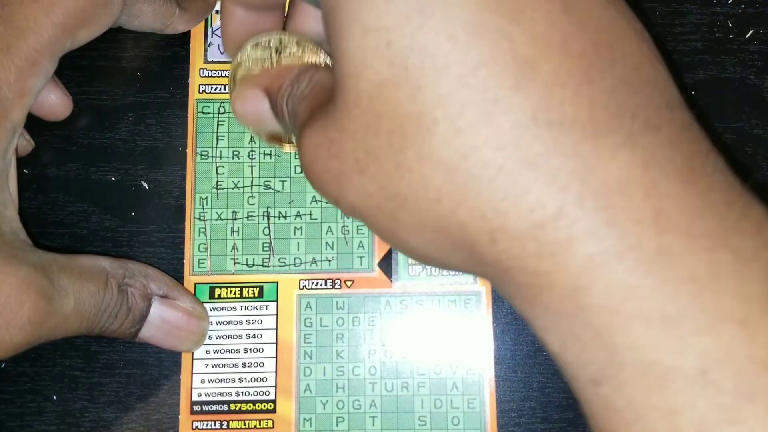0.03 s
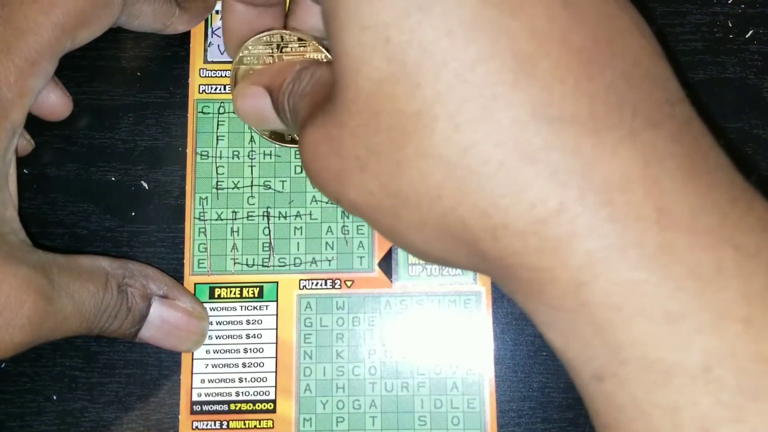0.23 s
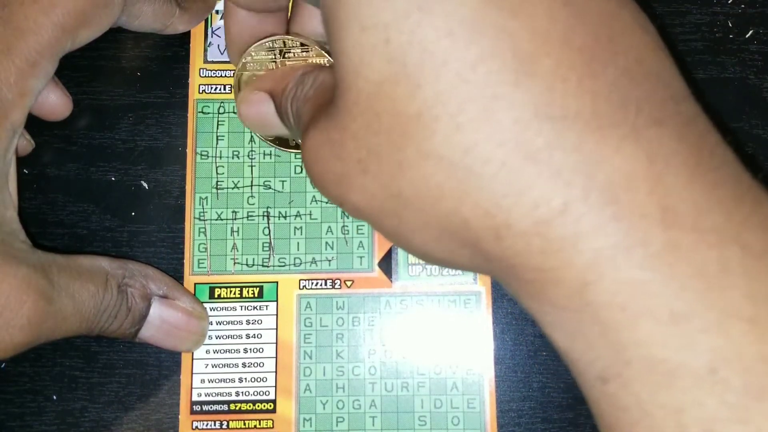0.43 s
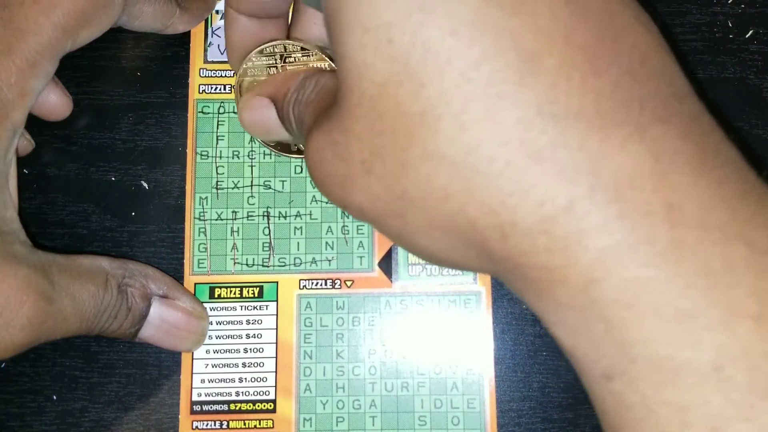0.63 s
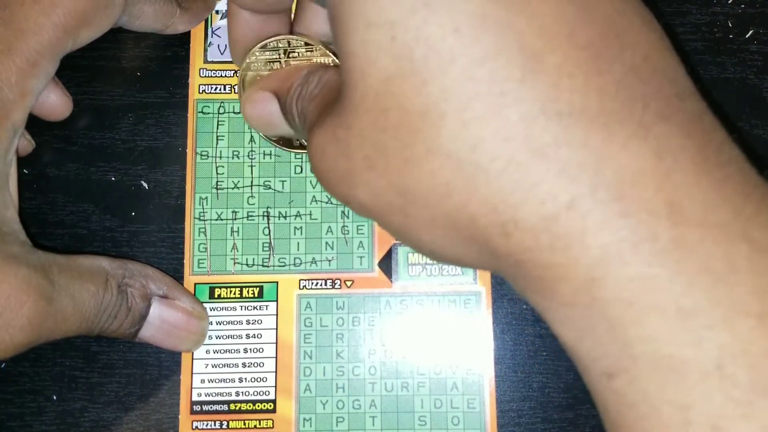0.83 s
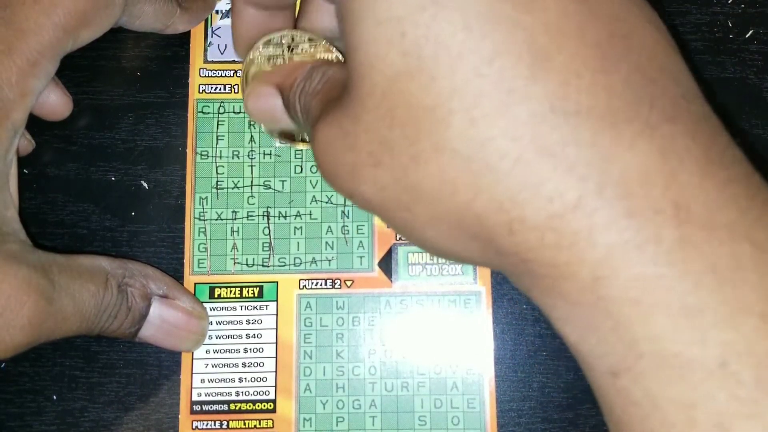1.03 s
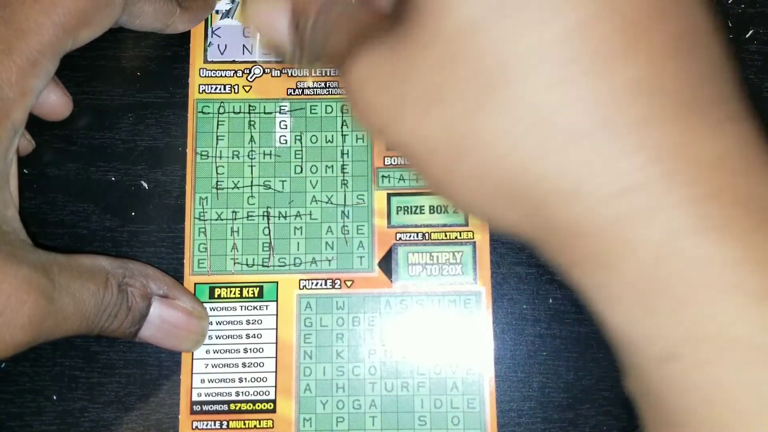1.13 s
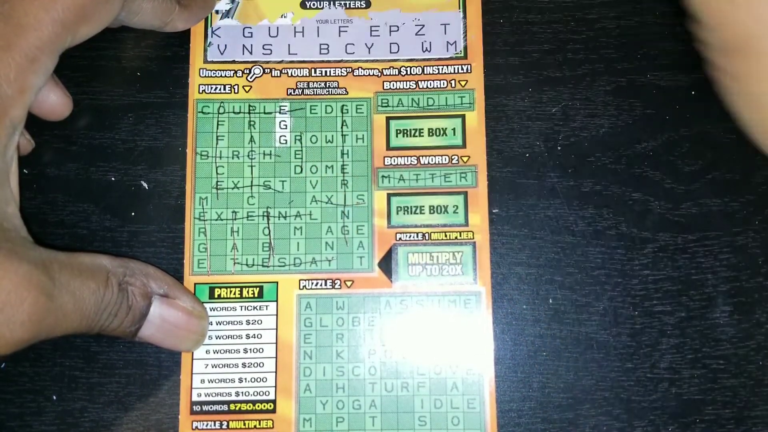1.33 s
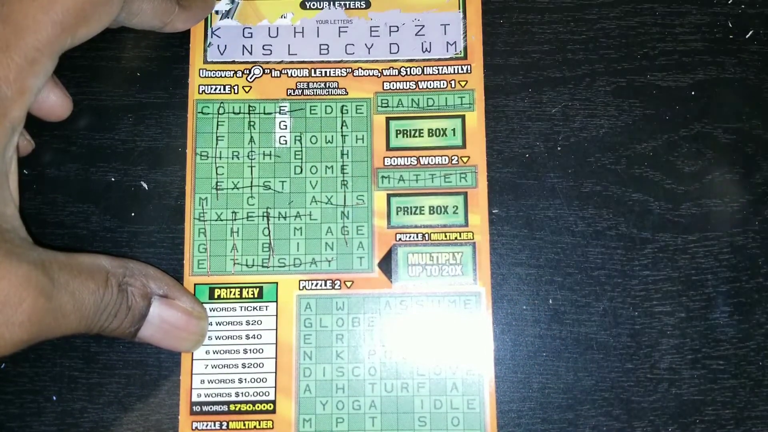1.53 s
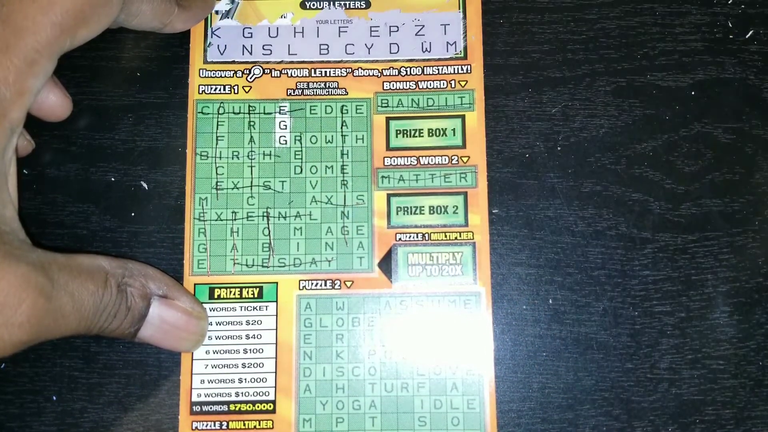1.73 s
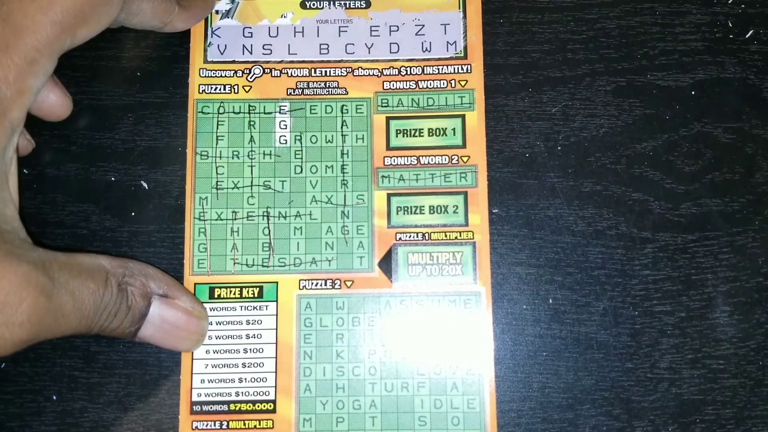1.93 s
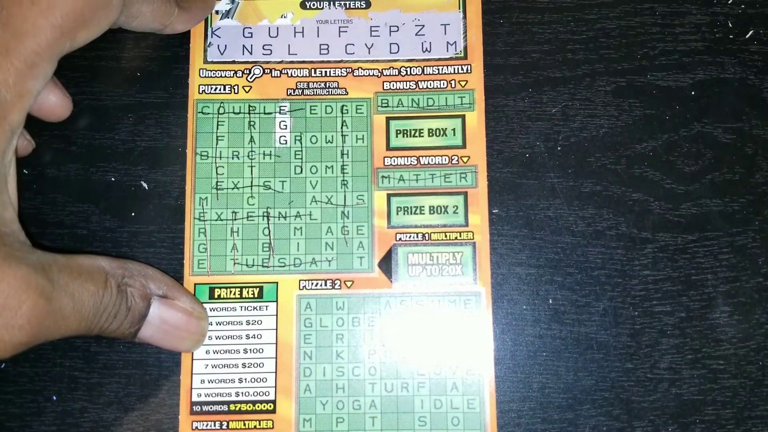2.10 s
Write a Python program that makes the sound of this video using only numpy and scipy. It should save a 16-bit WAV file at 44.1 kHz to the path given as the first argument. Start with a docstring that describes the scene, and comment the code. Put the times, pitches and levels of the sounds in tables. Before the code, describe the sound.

A coin scratches a paper ticket on a wooden table, close in stereo: quick, even, raspy strokes with woody hum, about ten per second, from 0 to 1.15 s. A quiet pause over low room rumble and hiss holds a soft arm bump and faint knock near 1.3 s. At 1.7 s the coin slaps down sharply, rattles, then drags with rubs, ticks and a thin rising squeak until 2.16 s.

```python
"""Over low room rumble and hiss, a coin edge scratches a paper ticket on a wooden table in quick strokes:
random grains of contact ring resonances of board, rasp, hum and thud, close to a stereo microphone.
In the pause a faint hiss sets in, the arm bumps softly and a knock sounds. Then the coin slaps down in a
chatter that rings decaying modes, grit and paper rattle, and the coin is dragged off: rubs, edge ticks
and at last a thin rising squeak of three stick-slip partials. Room reflections follow every source."""
import sys
import numpy as np
from scipy import signal
from scipy.io import wavfile

SR = 44100
rng = np.random.default_rng(int(sys.argv[2]) if len(sys.argv) > 2 else 0)


def inscribe(sig):
    """Save sig as 16-bit PCM at rate SR to the path in sys.argv[1].

    A 1-D sig is mono; a 2-D sig holds one channel per row.
    Samples are clipped to [-1, 1] before scaling.
    """
    pcm = np.round(np.clip(np.atleast_2d(sig).T, -1, 1) * 32767)
    wavfile.write(sys.argv[1], SR, pcm.astype(np.int16))


def how_loud(loudness_db):
    """Turn decibels into a plain amplitude multiplier (0 dB gives 1, 20 dB gives 10)."""
    steps = np.asarray(loudness_db, float) / 20
    return 10 ** steps


N = 95388  # samples

# Stereo place of the scratching by pitch: pitch_hz, left_minus_right_db
SCRATCH_PAN = [(200, 1), (1500, 0), (4500, 8), (10000, 1)]
# Stereo place of the slap and drag by pitch: pitch_hz, left_minus_right_db
SLAP_PAN = [(200, 2), (600, 0), (1100, 3), (4500, 12), (10000, 2)]
# Touches of the landing coin: start_s, level_db, brightness_db (tilt per two octaves, around 1 kHz)
SLAPS = [(1.7018, -17.5, -3), (1.7047, -25, -6), (1.7077, -22, 5), (1.7096, -25, -2), (1.7116, -20, -6)]
# Low resonances of the table: pitch_hz, width_hz (of one filter pass), level_db
THUD = [(99.7, 54, 0.5), (157.2, 37, -3), (205, 21, 4.5)]
SLAP_LEFT_LAG_S = .0001


def rms_one(x):
    """Scale to rms 1."""
    return x / np.sqrt(np.mean(x ** 2) + 1e-20)


def in_time(rows):
    """Columns of a curve at every sample."""
    s, *columns = np.transpose(rows)
    return [np.interp(np.arange(N) / SR, s, c) for c in columns]


def at_hz(points, hz):
    """Read a spectrum table along a logarithmic pitch axis."""
    table_hz, table_values = np.array(points).T[:2]
    return np.interp(np.log(hz), np.log(table_hz), table_values)


def drift(rate_hz):
    """Smooth random wander of rms 1, made at every 40th sample by a two-pole lowpass."""
    r = np.exp(-80 * np.pi * rate_hz / SR)
    noise = rng.standard_normal(N // 40 + 2002)
    slow = signal.lfilter([1], [1, -2 * r, r * r], noise)[2000:]  # settled part
    return np.interp(np.arange(N) / 40, np.arange(len(slow)), rms_one(slow))


def sides(db):
    """Left and right gains for a level difference."""
    return how_loud(np.array([db / 2, -db / 2]).reshape(2, -1))


def late(x, lag_s):
    """Let the left channel lag the right, half of the shift on each side."""
    t, half = np.arange(N), lag_s * SR / 2
    return np.array([np.interp(t - half, t, x[0]), np.interp(t + half, t, x[1])])


def grains():
    """Dense random catches of an edge on a rough surface."""
    grains_per_s, spread_db, lumps_db = 4400, 1.5, 1
    sizes = how_loud(spread_db * np.minimum(rng.exponential(1, N), 5)) * rng.choice([-1, 1], N)
    caught = rng.random(N) < grains_per_s / SR
    return rms_one(how_loud(lumps_db * drift(20)) * sizes * caught)


def swells(rows, column):
    """Speed rises and falls within each stroke; rows begin with start_s, length_s."""
    t, sharpness, out = np.arange(N) / SR, 1.48, 0
    for row, db in zip(rows, column):
        progress = np.clip((t - row[0]) / row[1], 0, 1)
        out = out + how_loud(db) * np.sin(np.pi * progress) ** sharpness
    return out


def rubbed(drive, envelope, peaks, pan):
    """Grains through parallel resonances, each passed twice; rms 1 before panning at envelope 1."""
    out, full = 0, 0
    for k, (hz, width, db) in enumerate(peaks):
        r = np.exp(-np.pi * max(width, 10) / SR)
        sos = 2 * [[1 - r * r, 0, r * r - 1, 1, -2 * r * np.cos(2 * np.pi * hz / SR), r * r]]
        gain = (-1) ** k * how_loud(db)  # neighbours in opposite sense
        steady, shaped = gain * signal.sosfilt(sos, [drive, drive * envelope + 1e-18])
        full = full + steady
        out = out + shaped * sides(at_hz(pan, hz))
    return out / np.sqrt(np.mean(full ** 2))


def struck(s, db, modes, pan, bright_db, scatter_db):
    """Soft clicks ring every mode, neighbours in opposite sense, with random strengths."""
    out, at = 0, (np.asarray(s) * SR).astype(int)
    for k, (hz, level_db, t60) in enumerate(modes):
        tilt_db = bright_db * np.log2(hz / 1000) / 2
        clicks = np.zeros(N)
        clicks[at] = how_loud(db + level_db + tilt_db + scatter_db * rng.standard_normal(len(at)))
        r, w = how_loud(-60 / (t60 * SR)), 2 * np.pi * hz / SR
        ringing = signal.lfilter([0, np.sin(w)], [1, -2 * r * np.cos(w), r * r], clicks + 1e-18)
        out = out + (-1) ** k * ringing * sides(at_hz(pan, hz))
    contact_band = signal.butter(2, [90, 11800], "band", fs=SR, output="sos")  # softens the clicks
    return signal.sosfilt(contact_band, out)


def floor():
    """Bands of stereo noise, 0.4 octave wide and slowly uneven: rumble below, hiss above."""
    # Spectrum: pitch_hz, density_db (per Hz, relative)
    spectrum = [(25, -10), (99, -1), (190, -4), (324, -10.5), (425, -21.5), (1550, -32.5), (5500, -28),
                (8000, -38), (10000, -32.5), (17000, -30)]
    # Likeness of left and right: pitch_hz, likeness (0 to 1)
    likeness = [(60, 0.95), (240, 0.71), (950, 0)]
    level_db, patchy_db = -64.5, 1.47
    out, edges = 0, 25 * 2 ** np.arange(0, 9.7, .4)
    white = rng.standard_normal((2, 2, N + 8000))  # neighbouring bands take different noise
    for k, (low, high) in enumerate(zip(edges, edges[1:])):
        band = signal.butter(2, [low, high], "band", fs=SR, output="sos")
        mid, side = signal.sosfilt(band, white[k % 2])[:, 8000:]
        hz = np.sqrt(low * high)
        alike = np.clip(at_hz(likeness, hz), 0, 1)
        gain = how_loud(at_hz(spectrum, hz) + patchy_db * drift(3.8))
        out = out + gain * (np.sqrt(1 + alike) * mid + np.sqrt(1 - alike) * side * [[1], [-1]])
    return how_loud(level_db) * rms_one(out)


def scratching():
    """Each stroke's grains drive board, rasp, hum and thud; light contact stays between strokes."""
    # Strokes: start_s, length_s, board_db, treble_rasp_db, table_hum_db, low_thud_db
    strokes = [(-.04, 0.089, -49.5, -57, -54, -56), (0.066, 0.091, -55, -58, -63.5, -64.5),
               (0.176, 0.093, -59, -69.5, -56.5, -59.5), (0.323, 0.065, -56.5, -67, -69.5, -92),
               (0.406, 0.081, -57.5, -64.5, -53.5, -57), (0.502, 0.083, -56.5, -66.5, -67, -67),
               (.61, 0.088, -55, -62.5, -56, -50.5), (0.712, 0.082, -49, -58, -62, -68),
               (0.805, .08, -51.5, -59.5, -54, -58), (0.905, 0.083, -53, -58.5, -65.5, -60),
               (0.994, .085, -56.5, -62.5, -58, -59.5), (1.089, 0.055, -67, -72, -70, -65.5)]
    # Resonances of the wooden board: pitch_hz, width_hz (of one filter pass), level_db
    board = [(764, 216, -7), (1015, 110, 0), (1177, 176, -15), (1402, 170, -15), (1576, 176, -17.5),
             (2154, 780, -27.5)]
    # Treble resonances of the rasp: pitch_hz, width_hz (of one filter pass), level_db
    rasp = [(2990, 610, -13), (3663, 294, -0.5), (4920, 1020, -2), (5850, 1550, -16.5),
            (10100, 2500, -27.5)]
    # Resonances of the table hum: pitch_hz, width_hz (of one filter pass), level_db
    hum = [(322, 134, -2), (474, 84, -1), (582, 66, 2.5)]
    between_db, lift_s, low_lead_s, left_lag_s = -27, 0.057, 0.0041, -.0001
    t, drive, out = np.arange(N) / SR, grains(), 0
    end_s = strokes[-1][0] + strokes[-1][1]
    touching = how_loud(between_db) * np.clip((end_s - t) / lift_s, 0, 1)
    leads_s = (0, 0, low_lead_s, low_lead_s)  # the push comes as the stroke begins
    for column, peaks, lead_s in zip(np.transpose(strokes)[2:], (board, rasp, hum, THUD), leads_s):
        lead = int(lead_s * SR)
        pushed = np.pad(swells(strokes, column)[lead:], (0, lead))
        envelope = touching * how_loud(column.mean()) + pushed
        out = out + rubbed(drive, envelope, peaks, SCRATCH_PAN)
    return late(out, left_lag_s)


def room(x):
    """Dense dying reflections, other ones on each side; the treble dies sooner."""
    t60_s, treble_t60_s, treble_db = 0.26, 0.18, -19
    split_hz, first_s = 4000, 0.007
    t = np.arange(SR // 2) / SR
    noise = rng.standard_normal((2, len(t)))
    low = signal.sosfilt(signal.butter(2, split_hz, fs=SR, output="sos"), noise)
    low_tail = rms_one(low) * how_loud(-60 * t / t60_s)
    treble_tail = rms_one(noise - low) * how_loud(treble_db - 60 * t / treble_t60_s)
    tail = low_tail + treble_tail
    tail = tail * (t > first_s) / np.sqrt(np.sum(tail ** 2) / 2)
    return signal.fftconvolve(x[None], tail, axes=1)[:, :N]


def sliding_hiss(drive):
    """A faint hiss: continuous grains through high and lower resonances, each with its own level curve."""
    # Level curve: time_s, high_db, lower_db
    slide = [(1.05, -88, -88), (1.45, -92, -98), (1.68, -74.5, -87), (1.85, -71.5, -72), (1.95, -70, -62),
             (2.163, -76, -66.5)]
    # High part: pitch_hz, width_hz (of one filter pass), level_db
    high = [(5520, 600, 0)]
    # Lower part: pitch_hz, width_hz (of one filter pass), level_db
    lower = [(2140, 2100, -2), (3360, 390, 1), (3800, 880, -2)]
    begun = np.arange(N) / SR > slide[0][0]
    parts = zip(in_time(slide), (high, lower))
    out = sum(rubbed(drive, how_loud(db) * begun, peaks, SLAP_PAN) for db, peaks in parts)
    return late(out, SLAP_LEFT_LAG_S)


def arm_bump():
    """The arm bumps the table softly: a swell of grains through the thud resonances."""
    # Bump: start_s, length_s, level_db
    bumps = [(1.26, .12, -61)]
    left_lag_s = -.0001
    out = rubbed(grains(), swells(bumps, np.transpose(bumps)[2]), THUD, SCRATCH_PAN)
    return late(out, left_lag_s)


def knock():
    """One faint click rings two short modes."""
    modes = [(820, 0, .04), (2400, -12, .01)]  # pitch_hz, level_db, t60_s
    return struck([1.301], -57, modes, SCRATCH_PAN, 0, scatter_db=0)


def slap():
    """The coin lands in a chatter of touches, each ringing the modes of coin and table."""
    # Modes of coin and table: pitch_hz, level_db, t60_s
    modes = [(163.7, -23.5, 0.16), (406, -23, .05), (464, -16, 0.033), (689, -24, 0.11), (750, -23.5, .04),
             (1024, 0, .028), (1278, -16.5, 0.12), (1340, -25.5, 0.043), (1510, -9, 0.03),
             (1755, -13.5, 0.055), (1954, -7, 0.02), (2328, -14, 0.026), (2720, -14.5, 0.058),
             (3000, -10, 0.0063), (3800, -18.5, 0.0056), (5040, -11.5, 0.014), (6800, -27, .006),
             (9900, -32, 0.0031), (14500, -36.5, 0.0038)]
    s, db, bright_db = np.transpose(SLAPS)
    return late(struck(s, db, modes, SLAP_PAN, bright_db, scatter_db=1.0), SLAP_LEFT_LAG_S)


def rattle():
    """Loose grit and paper: a grainy wash that dies after the slap."""
    # Resonances of the wash: pitch_hz, width_hz (of one filter pass), level_db
    peaks = [(2000, 3200, -5.5), (4480, 2800, -8.5)]
    level_db, t60_s = -49, 0.21
    since = np.arange(N) / SR - SLAPS[0][0]
    envelope = (since > 0) * how_loud(level_db - 60 * np.abs(since) / t60_s)
    return late(rubbed(grains(), envelope, peaks, SLAP_PAN), SLAP_LEFT_LAG_S)


def rubbing(drive):
    """Short rubs of the dragged coin: swelling grains excite board and upper hum of the table."""
    # Rubs: start_s, length_s, board_db, upper_hum_db
    rubs = [(1.746, 0.11, -55, -78), (1.856, 0.079, -48, -62), (1.92, 0.034, -49, -67),
            (1.939, 0.052, -52.5, -51.5), (1.992, 0.1, -54.5, -56), (2.079, 0.097, -86, -64)]
    # Board resonances: pitch_hz, width_hz (of one filter pass), level_db
    board = [(1022, 85, 0), (1100, 170, -8), (780, 250, -19)]
    # Upper hum resonances: pitch_hz, width_hz (of one filter pass), level_db
    hum = [(1359, 130, -1), (1540, 170, -11)]
    parts = zip(np.transpose(rubs)[2:], (board, hum))
    out = sum(rubbed(drive, swells(rubs, db), peaks, SLAP_PAN) for db, peaks in parts)
    return late(out, SLAP_LEFT_LAG_S)


def ticks():
    """Small ticks of the coin edge, each ringing bright short modes."""
    # Ticks: start_s, level_db
    hits = [(1.846, -58.5), (1.8821, -47.5), (1.8901, -48.5), (1.8967, -45), (1.9609, -46), (1.965, -50.5)]
    # Modes of the ticks: pitch_hz, level_db, t60_s
    modes = [(1375, -0.5, .02), (2510, -8.5, 0.019), (3170, 5, 0.011), (4070, -7, 0.019),
             (4800, 2.5, 0.0028), (5650, -6, 0.019), (6400, -6.5, 0.0079)]
    pan = [(1000, 2), (3000, 12.5)]  # pitch_hz, left_minus_right_db
    s, db = np.transpose(hits)
    return late(struck(s, db, modes, pan, 0, scatter_db=2.0), SLAP_LEFT_LAG_S)


def squeak():
    """Stick-slip sings three rising partials that wobble in pitch and flutter in level."""
    # Squeak curve: time_s, slip_rate_hz, second_partial_db, third_partial_db
    curve = [(1.98, 1255, -77, -83), (2.0, 1300, -62, -78), (2.05, 1385, -68, -76), (2.09, 1460, -59, -65),
             (2.12, 1540, -67.5, -70), (2.14, 1605, -60, -74), (2.163, 1660, -53, -74)]
    first_db, wobble, flutter_db, pan_db = -14, 0.00495, 2.5, 10  # first_db is relative to the second
    hz, second_db, third_db = in_time(curve)
    phase = 2 * np.pi * np.cumsum(hz * (1 + wobble * drift(54))) / SR
    tone = 0
    for k, db in enumerate((second_db + first_db, second_db, third_db)):
        level = np.sqrt(2) * how_loud(db + flutter_db * drift(28))
        tone = tone + level * np.sin((k + 1) * phase)
    begun = np.arange(N) / SR > curve[0][0]
    return late(tone * begun * sides(pan_db), SLAP_LEFT_LAG_S)


def scene():
    """All sources, their room and the floor."""
    drag_grains = grains()  # hiss and rubs share the same catches
    near = scratching() + sliding_hiss(drag_grains) + arm_bump() + knock()
    near = near + slap() + rattle() + rubbing(drag_grains) + ticks() + squeak()
    room_db = -15.5
    return near + how_loud(room_db) * room(near.mean(axis=0)) + floor()


def roll_off(x):
    """The treble ends steeply here."""
    return signal.sosfilt(signal.butter(12, 15980, fs=SR, output="sos"), x)


def record(dry):
    """A steep lowpass cuts the top of the finished mix."""
    lowpass = signal.cheby2(12, 60, 15900, fs=SR, output="sos")  # 60 dB down from 15900 Hz
    cut = signal.sosfilt(lowpass, dry)
    return roll_off(cut)


dry = scene()
out = record(dry)
inscribe(out)
```